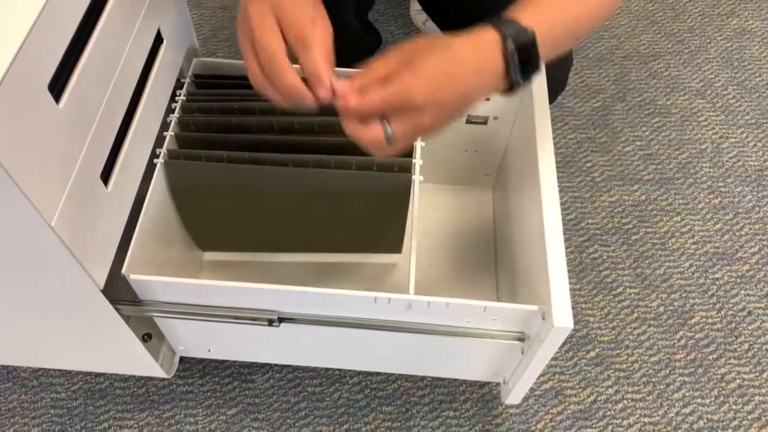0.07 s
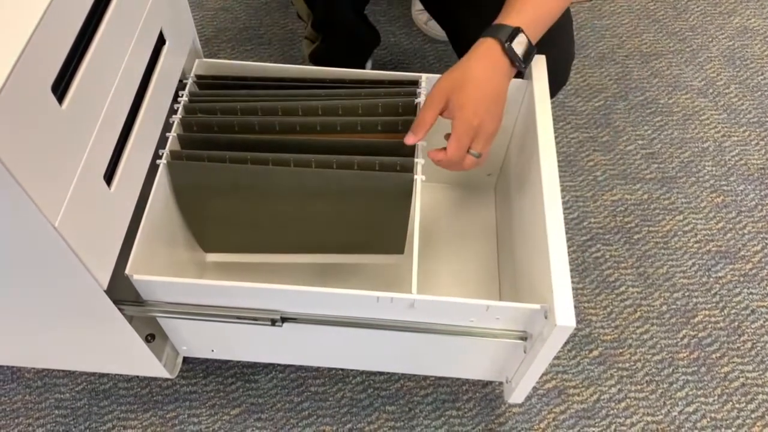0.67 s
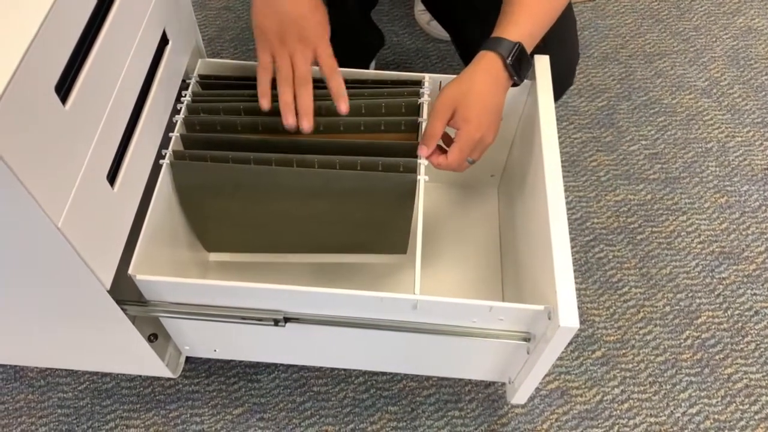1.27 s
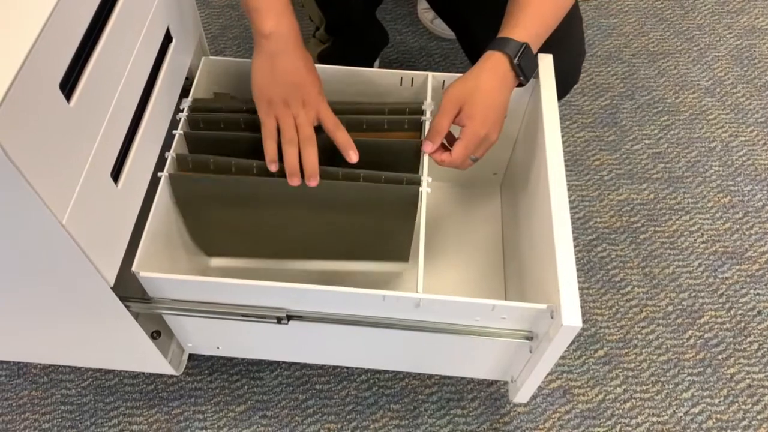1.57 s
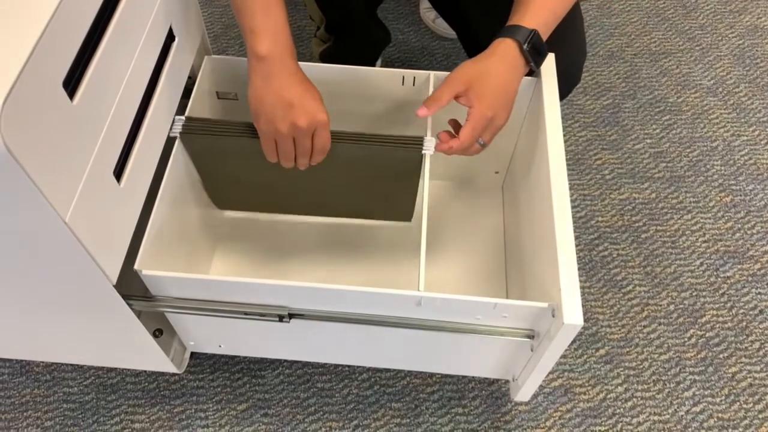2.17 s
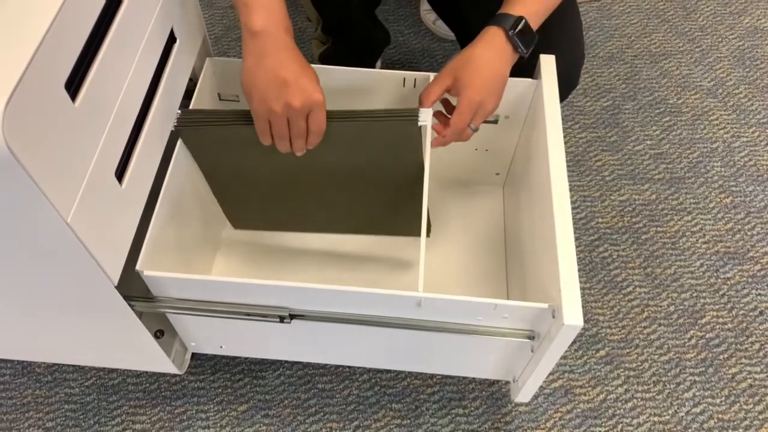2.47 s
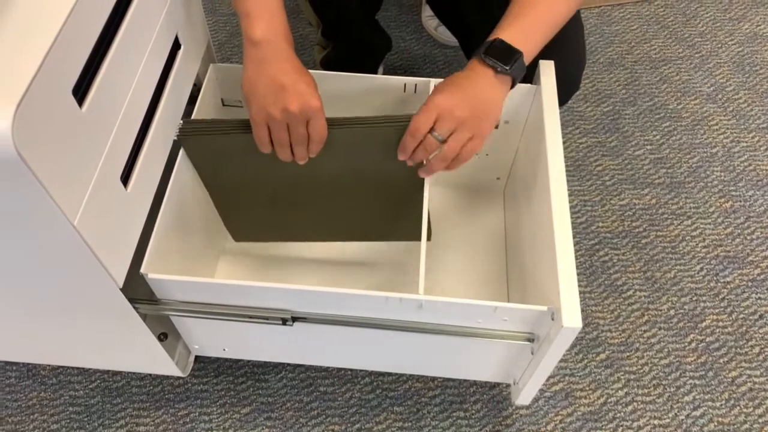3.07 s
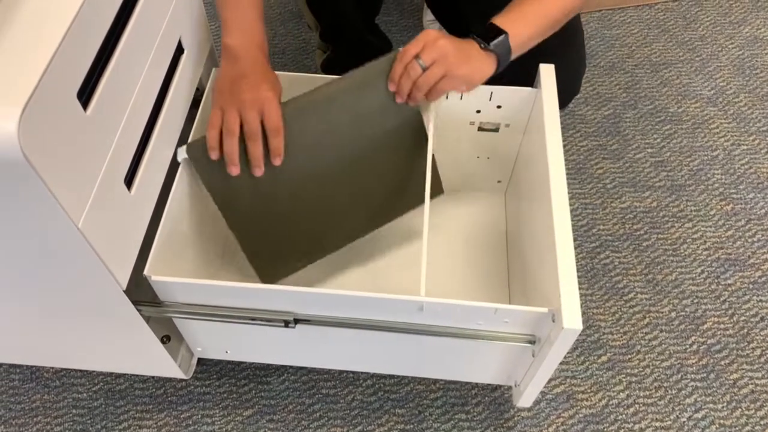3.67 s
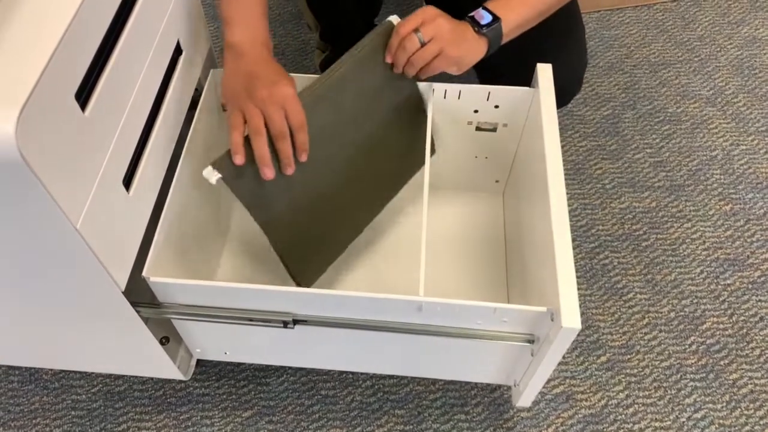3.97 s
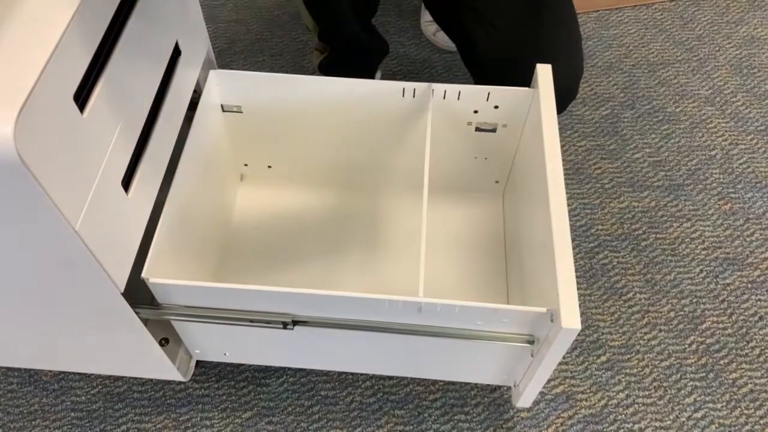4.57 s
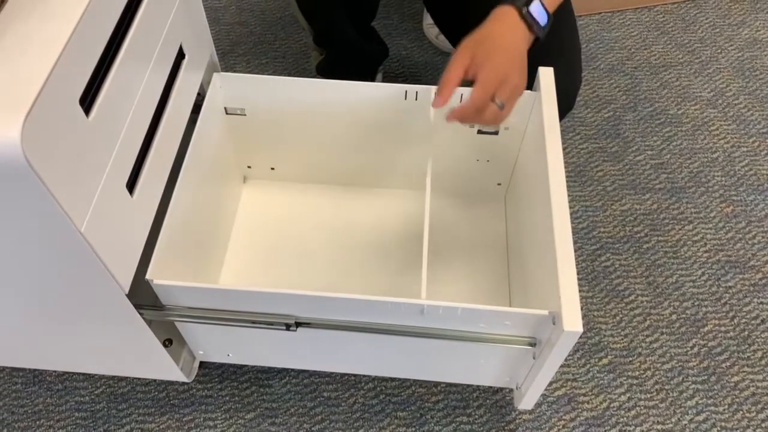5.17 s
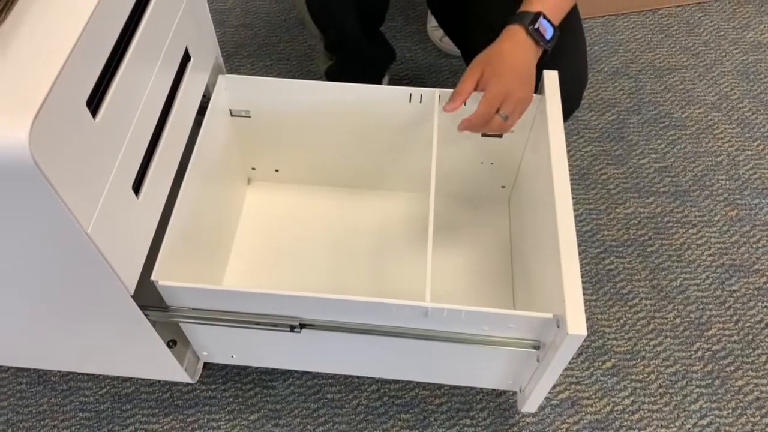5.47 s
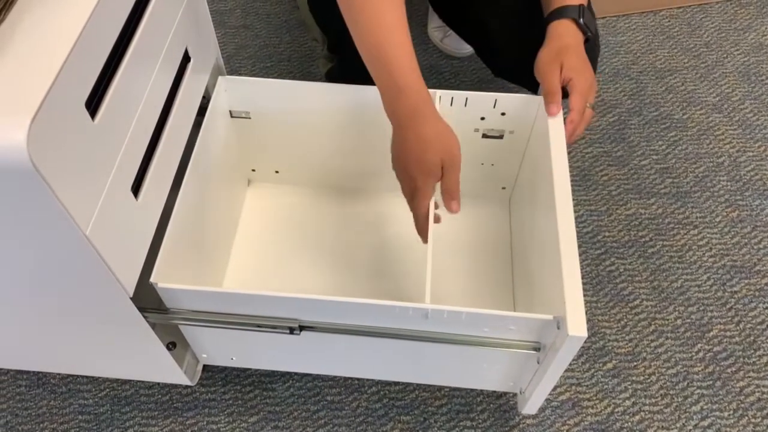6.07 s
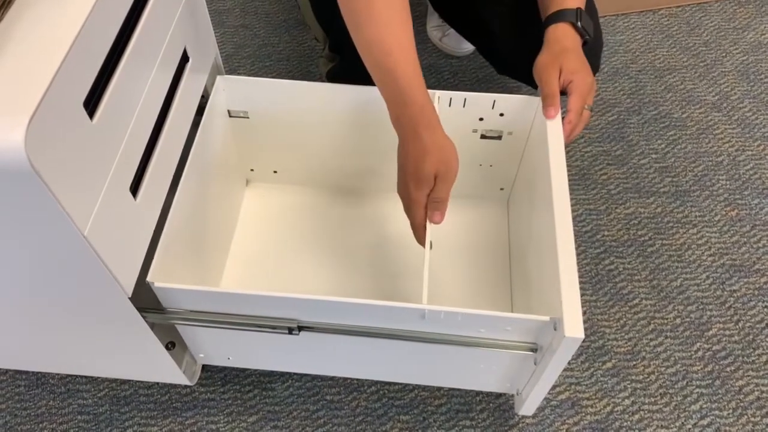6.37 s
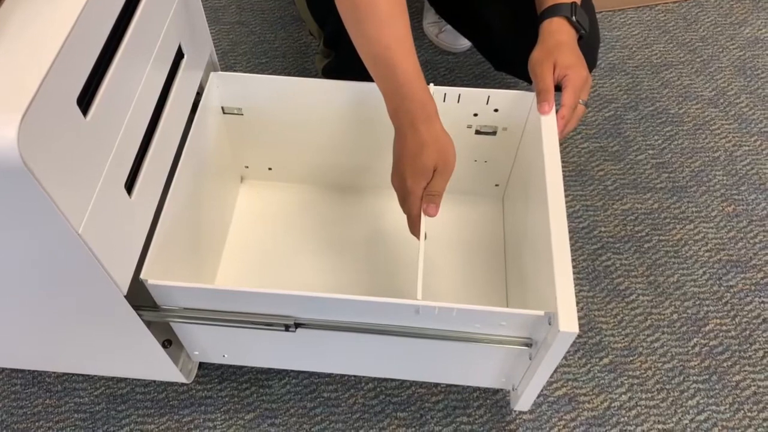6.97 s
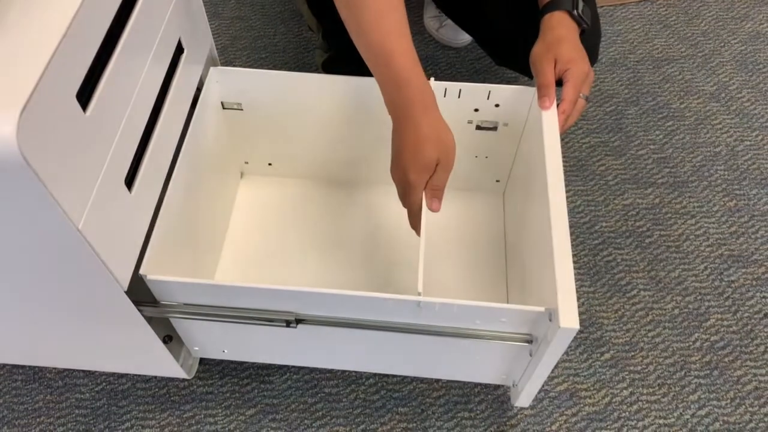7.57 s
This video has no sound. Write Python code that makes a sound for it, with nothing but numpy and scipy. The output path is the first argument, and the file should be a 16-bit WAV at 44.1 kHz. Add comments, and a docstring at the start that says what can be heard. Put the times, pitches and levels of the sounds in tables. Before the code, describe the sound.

Soft bumps and ticks lead into a quick scrape and clatter of hanging folders pushed along a filing drawer's rails. Card rubs on card as they are drawn out, and their hooks clack as they are put aside. Three loud knocks on the cross rail follow, each leaving a hollow metallic ring. The sound is close and mono, in a carpeted office with steady ventilation rumble.

```python
"""An open filing drawer in a carpeted office, heard close up on one microphone over a ventilation rumble.
First come soft handling bumps and ticking hooks; then the hanging card folders are pushed together,
scraping and slapping the rails. Folders are lifted out, card rubbing on card, and their hooks clack
and ring as they are set down. Last, fingers brush the cross rail and it is knocked loose: three sharp
blows, with two light ones between them, set the drawer ringing."""
import sys
import numpy as np
from scipy import signal
from scipy.fft import rfft, irfft, next_fast_len
from scipy.io import wavfile

SR = 44100
rng = np.random.default_rng(int(sys.argv[2]) if len(sys.argv) > 2 else 0)


def to_wav(sig):
    """Store sig (one row per channel, or 1-D mono) as 16-bit WAV at the path in sys.argv[1].

    Samples outside -1..1 are clipped; the rate is SR.
    """
    pcm = np.clip(np.atleast_2d(sig), -1, 1) * 32767
    pcm = np.round(pcm).astype(np.int16)
    wavfile.write(sys.argv[1], SR, pcm.T)  # frames by channels


N = 344421
TIME = np.arange(N) / SR
BIN_HZ = np.maximum(np.fft.rfftfreq(next_fast_len(N), 1 / SR), 1)
BAND_HZ = np.geomspace(50, 15000, 44)

# spectrum of card or a hook hitting a rail: (frequency [Hz], level [dB])
CONTACT_COLOUR = [(100, -4), (300, -0.5), (800, -2.5), (1400, -12.5), (2200, -7), (3000, -11.5), (4000, -8),
                  (5000, -10.5), (7000, -9), (14000, -6.5)]
# decay after such a contact: (frequency [Hz], t60 [s])
CONTACT_T60 = [(150, .5), (1000, .45), (4000, .32), (8000, .19), (14000, .11)]
# spectrum of sliding along the rails: (frequency [Hz], level [dB])
SCRAPE_COLOUR = [(240, -27), (400, -6.5), (1220, -8), (1570, -10), (2850, -14), (3730, -10), (4590, -18),
                 (7500, -22), (8570, -26), (9940, -20.5), (14000, -27.5)]


def from_db(db):
    """Decibels to gain."""
    return 10 ** (np.asarray(db) / 20)


def rms_one(x):
    """Scale to unit power."""
    return x / np.sqrt(np.mean(x ** 2) + 1e-20)


def at_hz(points, hz):
    """Read a table on a log-frequency axis."""
    freqs, values = np.transpose(points)
    return np.interp(np.log(hz), np.log(freqs), values)


def coloured(x, gain):
    """Filter by one gain per frequency bin."""
    size = next_fast_len(N)
    return irfft(rfft(x, size) * gain, size)[:N]


def band_pass(x, low_hz, high_hz):
    """Keep one band."""
    return signal.sosfilt(signal.butter(2, [low_hz, high_hz], "band", fs=SR, output="sos"), x)


def drift(per_s):
    """Glide between random values of spread 1."""
    knots = rng.standard_normal(N // 20)
    return np.interp(TIME * per_s, np.arange(len(knots)), knots)


def struck(times, levels_db, hz, t60, spread_db):
    """One mode rings as a dying sine, hit a little differently every time."""
    clicks = np.zeros(N)
    heights = from_db(levels_db + spread_db * rng.standard_normal(len(times)))
    clicks[np.round(times * SR).astype(int)] = heights
    r, w = from_db(-60 / (t60 * SR)), 2 * np.pi * hz / SR
    return signal.lfilter([0, np.sin(w)], [1, -2 * r * np.cos(w), r * r], clicks + 1e-18)


def resonant(x, peaks):
    """Add narrow resonances that ring on after whatever passes through."""
    out = x.copy()
    for hz, width_hz, db in peaks:
        r, w = np.exp(-np.pi * width_hz / SR), 2 * np.pi * hz / SR
        ringing = signal.lfilter([1, 0, -1], [1, -2 * r * np.cos(w), r * r], x + 1e-18)
        out += from_db(db) * (1 - r * r) / 2 * ringing
    return out


def blows(events, colour, t60s, crack_db, crack_t60):
    """Each blow is a short crack, then crowded resonances and room that die faster towards the treble."""
    white, half_step = rng.standard_normal((2, N)), np.sqrt(BAND_HZ[1] / BAND_HZ[0])
    bands = np.array([band_pass(white[k % 2], hz / half_step, hz * half_step)
                      for k, hz in enumerate(BAND_HZ)])
    out, t = np.zeros(N), TIME[:SR]
    crack = from_db(crack_db - 60 * t / crack_t60)
    tail = from_db(-60 * t / at_hz(t60s, BAND_HZ)[:, None])
    fade = np.hypot(tail, crack)
    for s, level_db, bass_db, bite_db, treble_db, rise_s in events:
        start = round(s * SR)
        size = min(SR, N - start)
        contact = [(450, bass_db), (1300, 0), (2300, 0), (3600, bite_db), (9000, treble_db)]
        gains = from_db(level_db + at_hz(colour, BAND_HZ) + at_hz(contact, BAND_HZ))
        attack = np.minimum(t[:size] / max(rise_s, 1e-4), 1) ** 2
        out[start:start + size] += gains @ (bands[:, start:start + size] * fade[:, :size]) * attack
    return out


def stroke(start, speed_up, hold, slow_down):
    """Friction grows as a power of the hand's speed over one movement, 0 to 1."""
    speed = np.interp(TIME, start + np.cumsum([0, speed_up, hold, slow_down]), [0, 1, 1, 0])
    return speed ** 1.44


def sliding(strokes, colour, catches_per_s, grain_db, judder_db):
    """Fibres catch in tiny clicks over a smooth rub; faces give the middle, thin edges the top."""
    powers = sum((from_db([[rub_db], [hiss_db]]) * stroke(*timing)) ** 2
                 for *timing, rub_db, hiss_db in strokes)
    rub, hiss = np.sqrt(powers)
    catches = (rng.random(N) < catches_per_s / SR) * rng.standard_normal(N)
    catches *= from_db(2.3 * np.minimum(rng.exponential(1, N), 4))   # a few stand out
    friction = rng.standard_normal(N) + from_db(grain_db) * rms_one(catches)
    friction *= from_db(judder_db * drift(110))
    shape, edge_share = from_db(at_hz(colour, BIN_HZ)), 1 / (1 + (6500 / BIN_HZ) ** 4)
    faces = rms_one(coloured(friction, shape * (1 - edge_share))) * rub
    edges = rms_one(coloured(friction, shape * edge_share)) * hiss
    return faces + edges


def rail_knocks():
    """The knocked cross rail jolts the drawer: panels clatter and single modes ring on."""
    # blows on the rail: (time [s], level [dB], bass [dB], bite [dB], treble [dB])
    knocks = [(6.516, -13.5, -9, 2, -2), (6.940, -34, -2.5, -4.5, -9), (7.214, -11, -4.5, 2.5, -3.5),
              (7.587, -31.5, -4, -14, -37), (7.659, -15, -8.5, 7, -4)]
    # long ringing of the drawer: (frequency [Hz], level [dB], t60 [s])
    drawer_modes = [(155, -25, .8), (224, -18, .7), (253, -15, .8), (346, -18, .6), (376, -16, 1.0),
                    (486, -18, .6), (596, -17.5, .75), (781, -21, .65), (1223, -28, .55), (1281, -30, .5),
                    (1407, -28, .45), (1605, -28, .3), (1945, -25, .36), (2120, -26, .33),
                    (2218, -18.5, .36), (2313, -22, .36), (3214, -32, .2), (3590, -31, .2),
                    (4629, -31, .14)]
    # dense panel resonances: (frequency [Hz], level [dB])
    panel_colour = [(60, 0), (130, 6.5), (350, 5), (430, -5), (600, -4.5), (800, -4.5), (1000, -16.5),
                    (1300, -5.5), (1720, -14), (2150, -6.5), (2700, -14.5), (3800, -16.5), (4900, -18.5),
                    (6500, -16.5), (10000, -13), (14000, -24)]
    # their decay: (frequency [Hz], t60 [s])
    panel_t60 = [(100, 1.14), (300, 1.08), (700, 0.95), (1800, 0.45), (3600, 0.28), (7000, 0.16),
                 (14000, 0.12)]
    # clusters of rail resonances: (frequency [Hz], width [Hz], level [dB])
    rail_clang = [(1400, 110, -4), (1980, 90, 0), (2220, 70, 1), (3210, 60, -3), (3620, 130, 4),
                  (4090, 110, 3), (5150, 100, -2), (6540, 60, 1), (7150, 70, -1)]
    # a heavy blow first takes up the rail's play with a lighter, brighter touch
    heavy_db, play_s, touch_rise_s, knock_rise_s = -25, 0.015, 0.0097, 0.004
    touches = [(s - play_s, db - 11.5, bass, bite, treble + 5.5, touch_rise_s)
               for s, db, bass, bite, treble in knocks if db > heavy_db]
    contacts = [(*row, knock_rise_s) for row in knocks] + touches
    s, level_db, bass_db, bite_db, _, rise_s = np.transpose(contacts)
    ringing = np.zeros(N)
    for hz, db, t60 in drawer_modes:
        drive_db = level_db + db + bass_db * (hz < 1000) + bite_db * (hz > 3000)
        ringing += struck(s + rise_s, drive_db, hz, t60, spread_db=1.5)
    panels = blows(contacts, panel_colour, panel_t60, crack_db=4.5, crack_t60=0.08)
    clatter = drawer_echoes(resonant(panels, rail_clang), echo_db=-4)
    return ringing + from_db(3) * clatter


def folder_hits():
    """Card slaps the rails and hooks snap onto them; both ring hollow in the drawer."""
    # folder edges on the rails: (time [s], level [dB], bass [dB], hardness as treble [dB])
    edge_hits = [(0.601, -31, -2.5, -20), (0.853, -37.5, 0.5, -11.5), (1.441, -21.5, -8, -11),
                 (1.539, -29, -0.5, -13), (1.618, -22, -15, -8.5), (1.839, -30.5, 7, -9),
                 (3.686, -27.5, 6, -21.5), (3.851, -32.5, 4, -17), (6.113, -34, 1, -32),
                 (6.219, -49.5, 19, -32)]
    # hooks on a rail, dry and hard: (time [s], level [dB], bass [dB])
    hook_hits = [(1.399, -58, -10), (1.771, -45, 20), (2.204, -38.5, 0), (2.215, -37, -13),
                 (2.273, -31.5, 3), (2.377, -37, 4), (3.661, -39, 7), (4.730, -63, -1.5), (5.037, -50, -2),
                 (5.227, -32, 0.5), (5.303, -44.5, 5), (5.332, -52, -8)]
    # their decay: (frequency [Hz], t60 [s])
    clack_t60 = [(300, 0.56), (1500, 0.28), (4000, 0.24), (12000, .11)]
    # hollow ring of card and hooks: (frequency [Hz], width [Hz], level [dB])
    hollow_ring = [(818, 23, -1), (1393, 140, 9.5), (1898, 170, -5), (2589.4, 59, 0), (4160, 690, -7)]
    # a softer slap builds up more slowly and, below a hardness of -11 dB, loses its bite too
    contacts = [(s, db, bass, 3 + min(0, hard + 11), hard, 0.0018 * 10 ** (-hard / 27.5))
                for s, db, bass, hard in edge_hits]
    slaps = blows(contacts, CONTACT_COLOUR, CONTACT_T60, crack_db=16, crack_t60=.035)
    bite_db, treble_db, rise_s = -1.5, -0.5, 0.0025
    snaps = [(*row, bite_db, treble_db, rise_s) for row in hook_hits]
    clacks = blows(snaps, CONTACT_COLOUR, clack_t60, crack_db=16, crack_t60=.035)
    return from_db(-7) * drawer_echoes(resonant(slaps + clacks, hollow_ring), echo_db=1)


def low_bumps():
    """Dull low bumps: soft handling at first, later the stack against the drawer."""
    # bumps: (time [s], level [dB], bass [dB])
    bumps = [(0.085, -58, 5.5), (.2, -63, 8.5), (1.468, -60, 12), (1.551, -52, 8.5), (2.328, -50, 16.5),
             (2.484, -56, 7.5), (3.0, -74, 24.5), (3.6, -67.5, 22.5)]
    # their spectrum: (frequency [Hz], level [dB])
    bump_colour = [(50, 6), (110, 2), (240, 12.5), (400, -1.5), (800, -2), (1300, -20), (4000, -24),
                   (14000, -28.5)]
    bite_db, treble_db, rise_s = -7.5, -16.5, 0.0033
    contacts = [(*row, bite_db, treble_db, rise_s) for row in bumps]
    return from_db(14.5) * blows(contacts, bump_colour, CONTACT_T60, crack_db=-13, crack_t60=0.02)


def stack_pushes():
    """The packed stack scrapes along the rails and the air it encloses resonates."""
    # shoves: (time [s], speed-up [s], hold [s], slow-down [s], rub [dB], edge hiss [dB])
    pushes = [(1.338, 0.059, .15, 0.11, -48.5, -51), (1.585, 0.027, 0.051, 0.21, -40, -42),
              (1.80, 0.01, 0.019, 0.21, -70, -61), (2.258, 0.0067, 0.056, 0.2, -61.5, -56.5)]
    # air between the folders: (frequency [Hz], width [Hz], level [dB])
    air_pockets = [(806, 60, 9), (1266, 120, 8), (2027, 120, 8), (2440, 44, 1), (3630, 170, 0),
                   (4350, 220, -4)]
    scrape = sliding(pushes, SCRAPE_COLOUR, catches_per_s=260, grain_db=4, judder_db=2.8)
    return from_db(-5) * resonant(scrape, air_pockets)


def folder_lifts():
    """Loose card is drawn out and put aside; its edge makes a rail sing."""
    # pulls: (time [s], speed-up [s], hold [s], slow-down [s], rub [dB], edge hiss [dB])
    pulls = [(2.78, 0.023, 0.058, 0.07, -68, -87.5), (2.99, 0.011, 0.012, 0.48, -74, -85),
             (3.2, 0.29, 0.028, 0.26, -49, -45.5), (4.0, .245, 0.021, 0.067, -65, -48),
             (4.27, .03, 0.04, 0.2, -70, -69), (4.39, 0.059, .09, 0.061, -79, -64),
             (4.59, 0.045, .01, .09, -78, -72.5), (5.03, 0.033, 0.032, .07, -63, -57),
             (5.13, 0.098, 0.018, .17, -63.5, -58)]
    # spectrum of loose card sliding: (frequency [Hz], level [dB])
    card_colour = [(240, -19), (400, 7), (817, 6.5), (1620, 2.5), (2050, 6), (4200, -2), (4870, -6.5),
                   (6650, -12.5), (8570, -14.5), (10100, -9), (14000, -13.5)]
    # resonances of the rubbed rail: (frequency [Hz], width [Hz], level [dB])
    rail_singing = [(3040, 50, -3), (6450, 55, 8), (11000, 140, 1)]
    rub = sliding(pulls, card_colour, catches_per_s=800, grain_db=-1, judder_db=1.6)
    return resonant(rub, rail_singing)


def rail_drags():
    """Fingers brush the cross rail, then it drags in its slots."""
    # movements: (time [s], speed-up [s], hold [s], slow-down [s], rub [dB], edge hiss [dB])
    drags = [(6.02, 0.042, .03, .05, -90, -70.5), (7.378, 0.011, 0.062, 0.16, -56, -60),
             (7.55, 0.1, .01, .02, -44.5, -62.5)]
    return sliding(drags, SCRAPE_COLOUR, catches_per_s=1200, grain_db=-1, judder_db=1.5)


def hook_ticks():
    """Small hard contacts ring briefly, each hook at its own pitch; a hook that swings free pings on."""
    # light contacts: (time [s], level [dB], ping relative to level [dB])
    ticks = [(0.141, -46, -15), (0.148, -43.5, -12), (0.18, -46, -22), (.205, -55.5, -25),
             (.215, -44.5, -42), (0.294, -50, -12), (.513, -54, -26), (0.747, -50, -21), (2.684, -55, -22),
             (2.797, -58.5, -20), (3.171, -54.5, -29), (4.075, -45, -45), (4.101, -45, -29),
             (4.117, -31.5, -30)]
    # modes of a hook: (frequency [Hz], level [dB], t60 [s])
    hook_modes = [(5400, -14, 0.027), (6530, -17, 0.053), (10340, -4.5, 0.037), (11200, -15, 0.022),
                  (11320, 1, .028), (14200, -2, .022)]
    s, level_db, ping_db = np.transpose(ticks)
    pitches = 1 + 0.024 * rng.standard_normal(len(s))
    rings = sum(struck(s[[k]], level_db[k] + db, hz * pitch, t60, spread_db=5.5)
                for k, pitch in enumerate(pitches) for hz, db, t60 in hook_modes)
    pings = struck(s, level_db + ping_db, hz=4020, t60=.17, spread_db=1)
    bass_db, bite_db, treble_db, rise_s = -3, 0, 3, .001
    contacts = [(at, db, bass_db, bite_db, treble_db, rise_s) for at, db in zip(s, level_db)]
    snaps = blows(contacts, CONTACT_COLOUR, CONTACT_T60, crack_db=16, crack_t60=0.011)
    return from_db(-8.5) * rings + pings + from_db(-17) * snaps


def brief_tones():
    """Brief narrow tones: squeaks, a low hum, and hooks ringing as they are set down."""
    # tones: (peak time [s], half-length [s], frequency [Hz], width [Hz], level [dB])
    tones = [(1.406, 0.012, 4220, 1300, -48), (1.445, 0.0067, 2080, 410, -36.5),
             (1.473, 0.0082, 1980, 200, -37), (1.688, 0.0043, 3740, 560, -28.5),
             (1.7, .05, 3840, 570, -47.5), (2.72, 0.17, 506, 45, -65.5), (4.125, 0.013, 5330, 210, -62),
             (4.21, 0.13, 6550, 34, -67), (5.236, 0.011, 2470, 180, -51),
             (7.708, 0.092, 372.7, 10.3, -36.5)]
    out = np.zeros(N)
    for s, half_length, hz, width_hz, level_db in tones:
        band = band_pass(rng.standard_normal(N), hz - width_hz / 2, hz + width_hz / 2)
        swell = np.exp(-np.minimum(((TIME - s) / half_length) ** 4, 40))
        out += from_db(level_db) * rms_one(band) * swell
    return out


def drawer_echoes(x, echo_db, count=16):
    """Reflections between the close walls carve a fine, steady ripple into the treble."""
    walls = np.zeros(SR // 20)
    delays_s = rng.uniform(.0008, .007, count)
    walls[(delays_s * SR).astype(int)] = rng.choice([-1, 1], count) / np.sqrt(count)
    strength = from_db(echo_db) / (1 + (1200 / BIN_HZ) ** 2)
    ripple = 1 + strength * rfft(walls, next_fast_len(N))
    return coloured(x, ripple / np.sqrt(1 + strength ** 2))


def flexing(x, per_s, echo_db):
    """The card bends and moves, so its reflections glide from one pattern to another."""
    turn = 2 * np.pi * per_s * TIME + drift(per_s * 4)
    first, second = (drawer_echoes(x, echo_db) for _ in range(2))
    share = np.sin(turn / 2) ** 2
    return (share * first + (1 - share) * second) / np.sqrt(1 - share * (1 - share))


def office(x, wet_db, t60, dull_hz):
    """The carpeted room adds a diffuse, dull tail."""
    t = TIME[:SR // 2]
    tail = rng.standard_normal(len(t)) * from_db(-60 * t / t60) * (t > .004)
    tail = signal.sosfilt(signal.butter(1, dull_hz, fs=SR, output="sos"), tail / np.linalg.norm(tail))
    return x + from_db(wet_db) * signal.fftconvolve(x, tail)[:N]


def ventilation():
    """Room tone: a steady low rumble with a faint hiss."""
    # spectrum of the moving air: (frequency [Hz], level [dB])
    air_colour = [(20, -10.5), (32, -21.5), (52, 5.5), (72, -3.5), (98, 4.5), (130, -1), (180, -12.5),
                  (240, -14), (320, -25.5), (500, -36.5), (1000, -51.5), (2500, -60), (7000, -66),
                  (14000, -59.5)]
    air = coloured(rng.standard_normal(N), from_db(at_hz(air_colour, BIN_HZ)))
    return from_db(-40) * rms_one(air)


def scene():
    """At the drawer, in mono: push, lift, set aside, then free the rail."""
    strokes = flexing(stack_pushes() + folder_lifts() + rail_drags(), per_s=2.5, echo_db=9)
    in_room = office(strokes + brief_tones(), wet_db=-7, t60=0.31, dull_hz=4000)
    return (in_room + folder_hits() + low_bumps() + hook_ticks() + rail_knocks() + ventilation())[None]


def record(dry):
    """The microphone port carves dips into the treble; the top is cut."""
    # dips of the port: (frequency [Hz], width [Hz], depth [dB])
    port_dips = [(4765, 43, 12), (8674, 330, 13.5), (11800, 370, 15.5)]
    cutoff_hz = 14080
    port_db = -sum(db * np.exp(-.5 * ((BIN_HZ - hz) / width) ** 2) for hz, width, db in port_dips)
    low_pass = 1 / np.sqrt(1 + (BIN_HZ / cutoff_hz) ** 340)
    return coloured(dry[0], from_db(port_db) * low_pass)[None]


dry = scene()
out = record(dry)
to_wav(out)
```